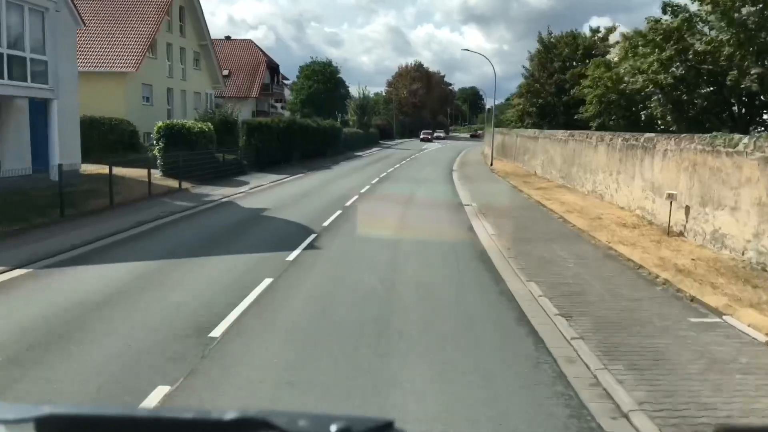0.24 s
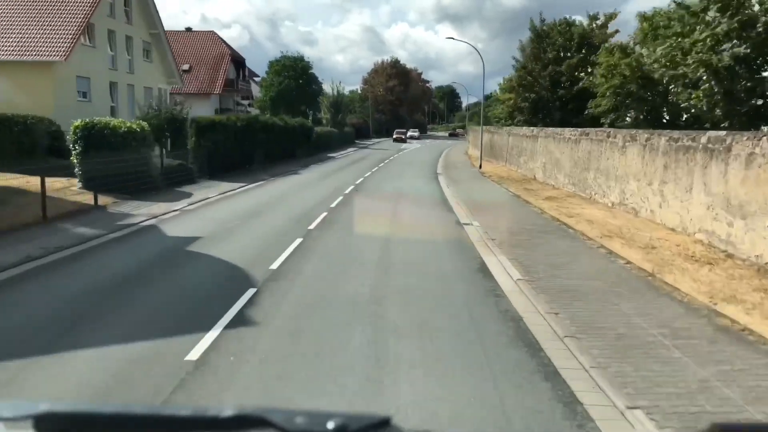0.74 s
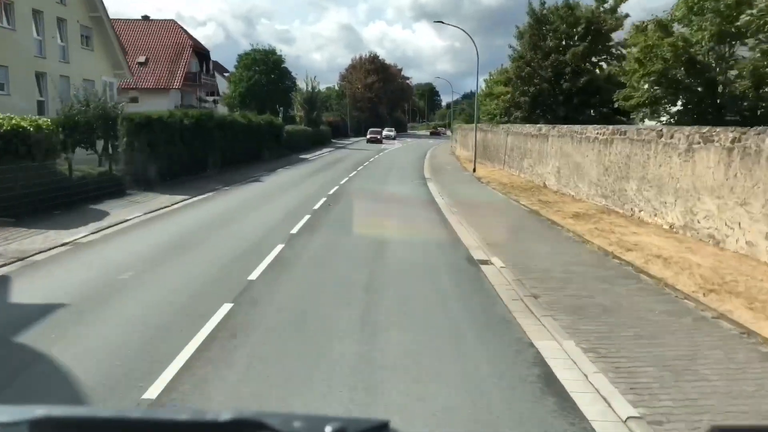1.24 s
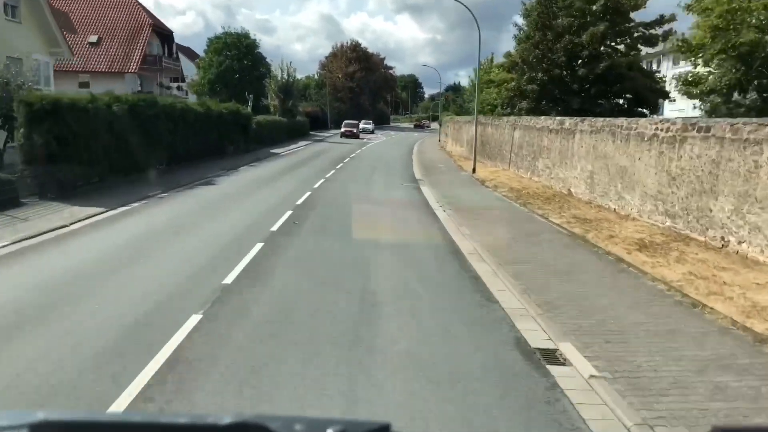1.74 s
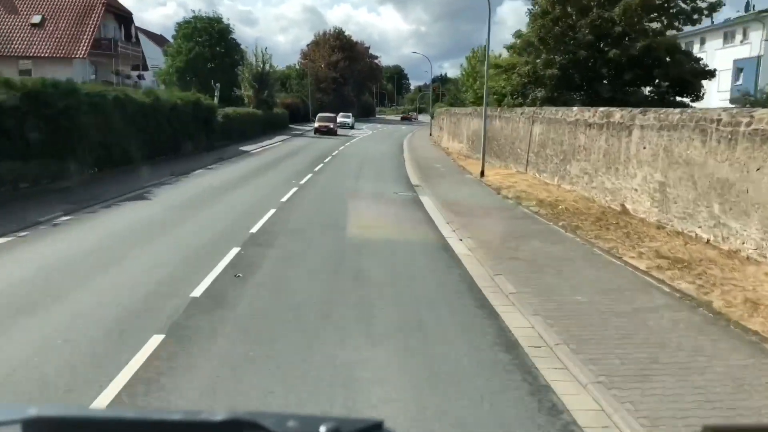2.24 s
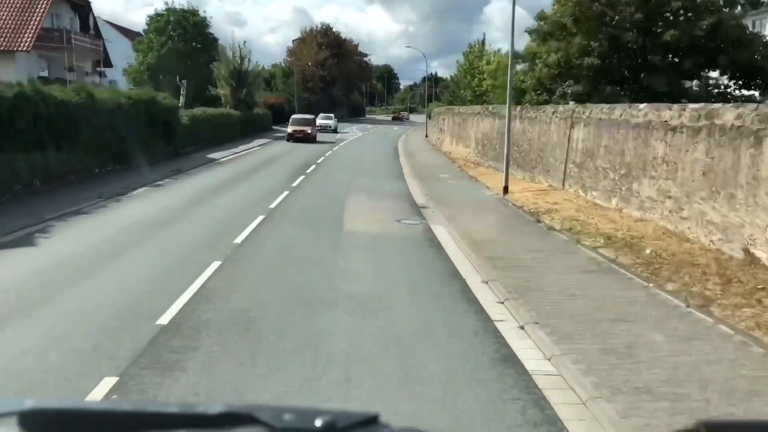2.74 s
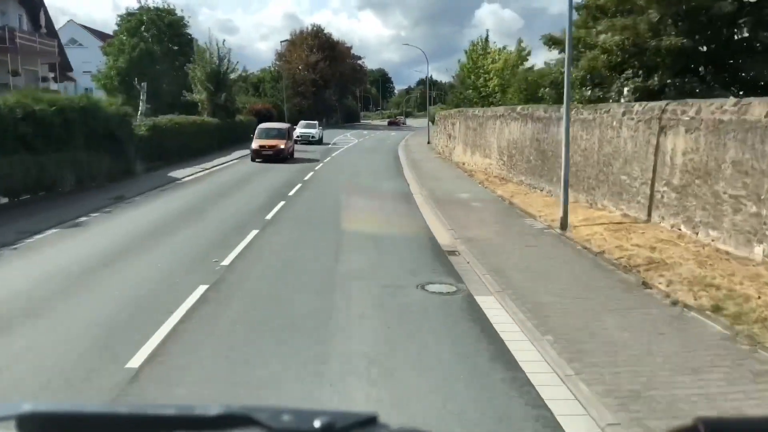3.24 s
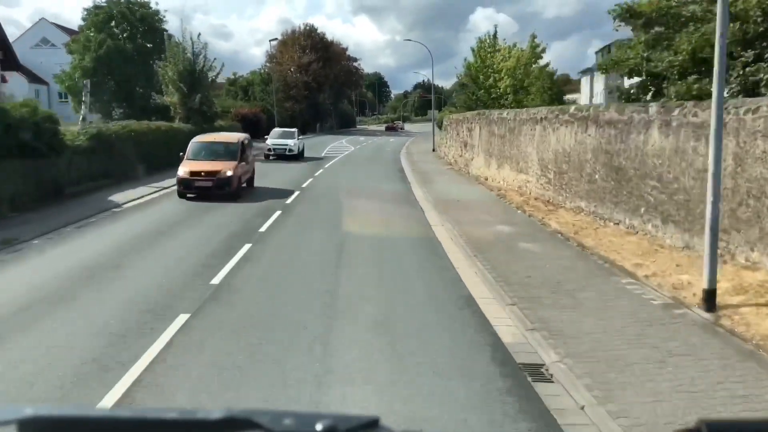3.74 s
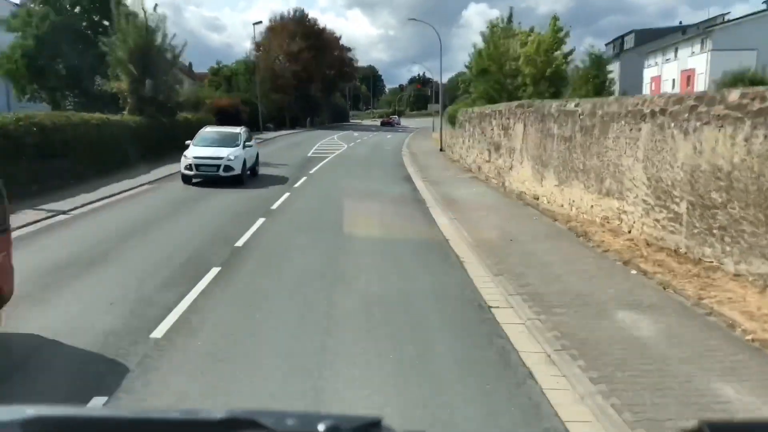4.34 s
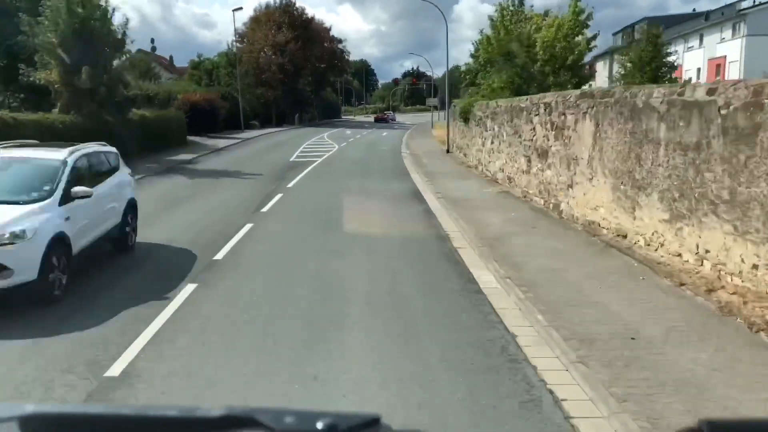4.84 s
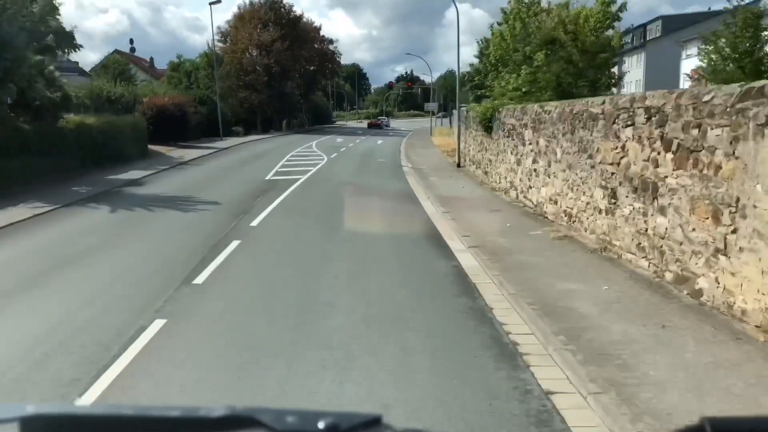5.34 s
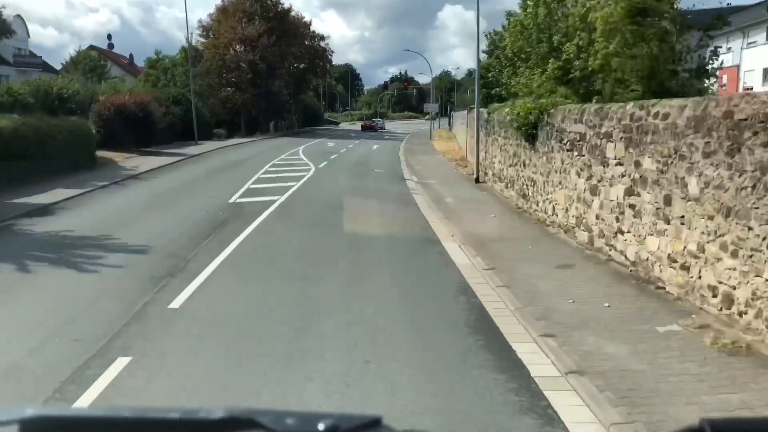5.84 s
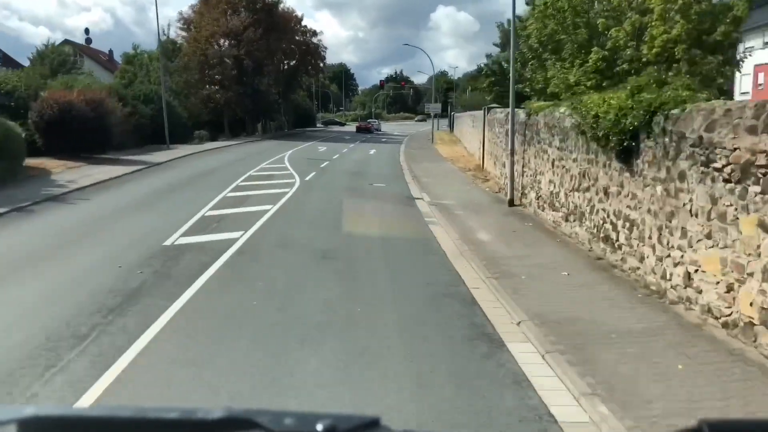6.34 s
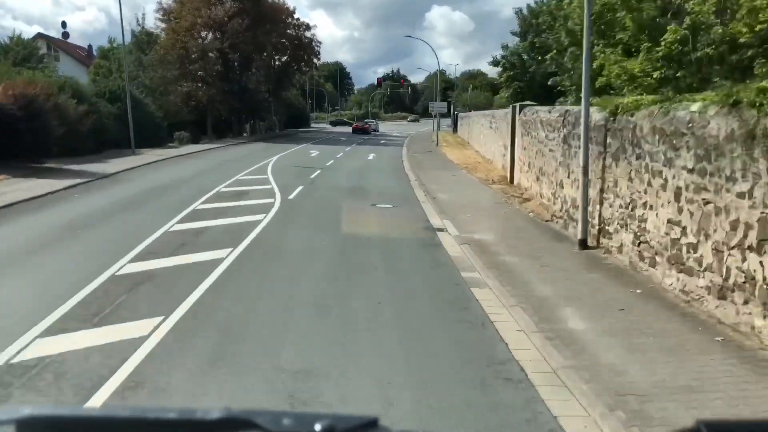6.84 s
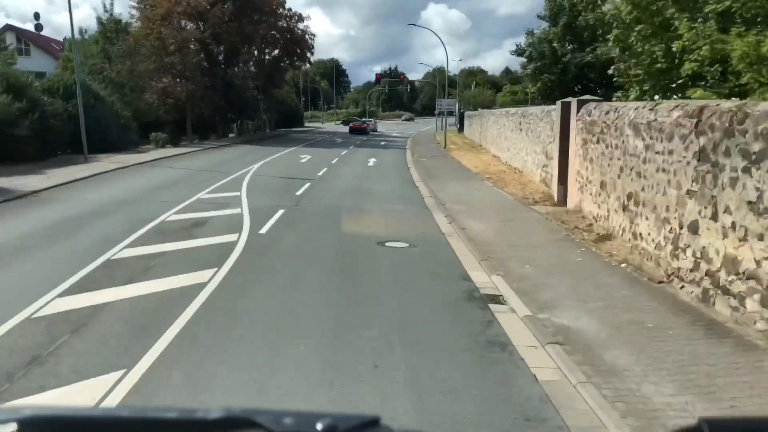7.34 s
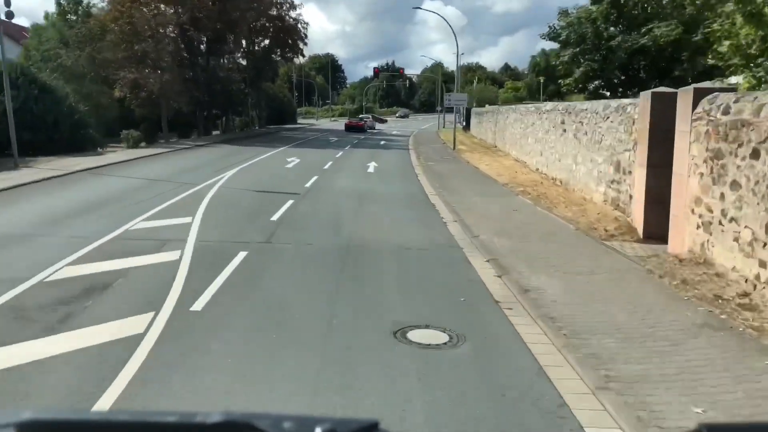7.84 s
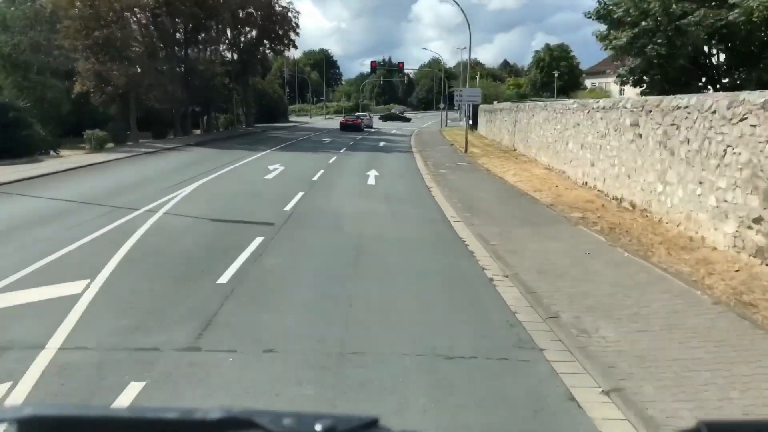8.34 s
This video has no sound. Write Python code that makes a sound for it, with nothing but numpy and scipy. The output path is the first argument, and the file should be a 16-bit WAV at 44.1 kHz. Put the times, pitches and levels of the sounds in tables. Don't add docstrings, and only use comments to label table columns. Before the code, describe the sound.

Inside a heavy truck cab, close to the windscreen. From 0 to 1.3 seconds the diesel pulls hard in low gear: a deep, booming drone climbing slightly, with road rumble, airy rush and loud, fluttering gear whine. From 1.3 to 2.4 the load drops away, the pitch sinks, a brief low axle hum shows and a high turbo whistle slides down. The higher gear engages around 2; from 2.6 to 3.8 the engine pulls again, lower and steadier, with fainter gear whine and a rising whistle. After 3.8 it eases off; the whistle falls again, a rush of air fades, and a slow low throb remains. At about 6.3 a short, sharp air hiss vents, with a thin swaying squeal from 6.6 to 7.7. Engine speed sags while tyre wash swells from 7.3, strongest after 8, with a faint soft puff near 8, ending still rolling at 8.6.

```python
import sys
import numpy as np
from scipy import signal
from scipy.io import wavfile
from scipy.ndimage import uniform_filter1d

SR = 44100
rng = np.random.default_rng(int(sys.argv[2]) if len(sys.argv) > 2 else 0)


def invert_db(x):
    u = np.asarray(x, float) / 20
    return 10 ** u


def to_wav(sig):
    pcm = np.clip(np.atleast_2d(sig), -1, 1) * 32767
    pcm = np.round(pcm).astype(np.int16)
    wavfile.write(sys.argv[1], SR, pcm.T)


N = 379701
TIME = np.arange(N) / SR

# f/Hz, level/dB per Hz
ROAD_SPECTRUM = [(30, -38), (50, -36), (65, -3), (160, 0.17), (250, -6), (400, -10), (700, -14),
                 (1200, -19), (1700, -26), (2400, -28.5), (4500, -33), (7000, -38.5), (11000, -44.5),
                 (15500, -60)]
# f/Hz, width/Hz, level/dB
PANEL_MODES = [(331.2, 74, -38), (695, 78, -45), (1052, 95, -50.5), (1368, 98, -51), (2349, 150, -54)]
# start t/s, end t/s, level/dB
ROUGH_STRETCH = (3.33, 4.37, 1.55)
# f/Hz, level/dB per Hz
ROAR_SPECTRUM = [(60, -30), (100, -1), (160, -29), (250, -6.5), (400, -11.5), (700, -15.5), (1200, -15),
                 (1700, -23), (2400, -23.5), (4500, -29.5), (5300, -31.5), (7000, -43), (11000, -40.5),
                 (15500, -43)]
# f/Hz, width/Hz, level/dB
BLOCK_MODES = [(1396, 24, -44), (1525, 62, -49), (1736, 81, -44.5), (2142, 79, -46.5), (4970, 150, -51)]
# f/Hz, level/dB per Hz
WASH_SPECTRUM = [(500, -26), (1200, -5.5), (1900, -6.5), (2300, 0), (3000, -2.5), (4500, -6), (7000, -10),
                 (11000, -12), (15500, -20)]
# f/Hz, width/Hz, level/dB
TREAD_MODES = [(2320, 260, -44), (2880, 240, -45)]
# t/s, level/dB
WASH_LEVEL = [(0, -6.5), (.2, -5.5), (1, -5), (1.6, -7), (2.05, -19), (2.6, -16), (3, -26), (3.6, -26),
              (3.8, -11), (4, -11.5), (4.5, -25), (6, -13.5), (6.9, -17), (7.35, -8.5), (7.85, -5.5),
              (8.02, -.5), (8.25, -0.5), (8.61, 0.5)]
# f/Hz, level/dB per Hz
VENT_SPECTRUM = [(1470, -33), (2500, 2), (2600, -6), (2830, 0), (3340, -5), (5720, 0), (7360, -0.5),
                 (15600, -2)]
# t/s, peak level/dB, rise t/s, hold t/s, fall/dB per s
VALVE_PUFFS = [
    (6.335, -32.5, .016, .053, 85),
    (6.18, -56, .02, .03, 200),
    (7.16, -58, .02, .03, 200),
    (7.96, -45, .05, .08, 60),
]
# t/s, f/Hz
ROTOR_DRIVE = [(0, 18600), (1.25, 18600), (1.3, 7500), (2.35, 7500), (3.1, 23500), (3.7, 22000),
               (3.75, 7500)]
# f/Hz, level/dB
WHISTLE_RESPONSE = [(8600, -72), (9050, -66), (10800, -59.5), (12000, -65.5), (14000, -60), (15300, -57.5),
                    (16500, -61), (18000, -75)]
# t/s, f/Hz
STAGE_DRIVE = [(0, 11550), (1.03, 11550), (1.1, 7500)]
# t/s, level/dB
STAGE_WHISTLE = [(0, -59), (.9, -58.5), (1.2, -56), (1.5, -65), (2.1, -80)]
TOOTH_ORDERS = (49.75, 63.75)
# start t/s, end t/s, level/dB of multiples 1, 1.5 and 2
MESH_TORQUE = [
    (-.2, 1.33, -37.5, -45, -47),
    (2.7, 3.85, -46, -52, -54),
]
# t/s, length t/s, multiple, level/dB
TOOTH_SINGS = [(.12, .1, 1, -33), (.31, .09, 1, -32), (.47, .1, 1, -32), (.73, .14, 1, -28),
               (.96, .08, 1, -35), (.34, .16, 1.5, -33), (.6, .22, 1.5, -33), (.8, .16, 1.5, -35),
               (.95, .22, 1.5, -33), (1.19, .2, 1.5, -32), (2.94, .13, 1, -40), (3.22, .16, 1, -39),
               (3.46, .16, 1, -39), (2.92, .13, 1.5, -41), (3.16, .1, 1.5, -43), (3.57, .14, 1.5, -42)]
# start t/s, end t/s, level/dB
TIMING_WHINE = (3.7, 7.3, -55.5)
# start t/s, end t/s, f/Hz, level/dB, width/Hz
AXLE_HUMS = [
    (1.15, 1.5, 187.5, -25, 4),
    (1.7, 2.0, 188, -30, 3),
    (6.55, 7.68, 4110, -53.5, 100),
]
# shaft order, level/dB over the fifth
SHAFT_HARMONICS = [(3, -7), (6, -4), (7, -9), (9, -14), (11, -10)]
# coasting level/dB, added pulling/dB, added braking/dB
SECOND_LEVELS = (-30, -4.5, 1)
FIFTH_LEVELS = (-42, 1.5, 8)
# t/s, f/Hz of the four-stroke cycle
CYCLE_SPEED = [(0, 14.05), (.8, 14.87), (1, 15.02), (1.2, 15), (1.4, 14.87), (1.6, 14.3), (1.8, 13.4),
               (2, 12.5), (2.2, 12.08), (2.45, 11.76), (2.7, 11.92), (3, 12), (3.4, 12.24), (3.9, 12.17),
               (5.2, 12.11), (7, 11.68), (7.8, 11.19), (8.61, 10.75)]
# t/s, level/dB
ENGINE_LOAD = [(0, 0), (1.2, -1.5), (1.45, -11), (1.8, -17), (2.3, -40), (2.6, -9), (2.85, -6), (3.6, -3),
               (3.9, -11.5), (4.25, -20), (6.2, -13), (6.7, -9), (8.61, -14)]
# t/s, level/dB
FIRING_STRENGTH = [(0, -20), (.25, -19), (.5, -22), (.7, -19), (1.3, -21.5), (1.55, -36), (1.85, -46),
                   (2.02, -23), (2.2, -41), (2.45, -32), (2.8, -20.5), (3.6, -20.5), (4, -31.5), (5.2, -37),
                   (7, -28), (8.2, -27.5), (8.61, -25.5)]
# order, low gear level/dB, pulling level/dB, coasting level/dB
WEAK_ORDERS = [(4, -42, -57, -51), (5, -40, -45, -48), (7, -34, -38, -42), (8, -31, -40, -47),
               (11, -34, -36, -38), (13, -37, -42, -46), (14, -34, -36, -41), (15, -41, -36, -42),
               (16, -48, -43, -47), (17, -44, -46, -47), (18, -42, -46, -46), (20, -45, -49, -49),
               (21, -47, -44, -48), (22, -46, -50, -48)]
# start t/s, end t/s, order, level/dB
CAB_SWELLS = [(-.1, 0.19, 12, -17.5), (.4, 1.208, 12, -18.5), (.6, .95, 12, -27), (1.55, 1.86, 12, -20.5),
              (2.027, 2.305, 12, -35), (2, 4.302, 12, -25), (3.063, 3.745, 12, -31), (4.5, 6.283, 12, -26),
              (6.154, 6.647, 12, -30.5), (6.55, 7.497, 12, -26), (8.004, 8.8, 12, -31), (.15, 1.53, 9, -21),
              (.45, 1.52, 9, -25), (2.25, 3.6, 9, -31.5), (3.5, 4.55, 9, -28.5), (4.6, 5.4, 9, -30.5),
              (7.5, 8.9, 9, -30.5), (-.3, 0.31, 10, -24), (.3, 1.5, 10, -33), (1.62, 2.03, 10, -24.5),
              (2.004, 2.454, 10, -28.5), (3, 4.296, 10, -30), (4.5, 5.3, 10, -34), (3.8, 4.246, 10, -35),
              (5.3, 6.5, 9, -35), (.2, 0.397, 12, -28)]
# start t/s, end t/s, order, level/dB
TRIM_BOOMS = [(0.288, 0.998, 18, -26), (.3, 1, 17, -34), (-.3, .7, 14, -26), (.8, 1.55, 8, -26),
              (3.45, 3.9, 17, -35), (4.7, 6.6, 22, -36), (7.795, 8.6, 20, -35), (7.798, 8.8, 21, -36.5),
              (7.9, 8.8, 22, -36.5)]


def evened(x):
    return x / np.sqrt(np.mean(x ** 2) + 1e-20)


def columns(rows):
    s, *values = np.transpose(rows)
    return [np.interp(TIME, s, v) for v in values]


def sounding(start, end, fade_s=0.057):
    return np.clip(np.minimum(TIME - start, end - TIME) / fade_s, 0, 1)


def arch(start, end):
    return np.sin(np.pi * np.clip((TIME - start) / (end - start), 0, 1)).clip(0)


def tone(turns, db):
    return np.sqrt(2) * invert_db(db) * np.cos(2 * np.pi * turns)


def wander(top_hz):
    rate_hz = 40
    steps = rng.standard_normal(int(N / SR * rate_hz) + 2)
    smooth = signal.lfilter([1], [1, -np.exp(-2 * np.pi * top_hz / rate_hz)], steps)
    return np.interp(TIME * rate_hz, np.arange(len(steps)), evened(smooth))


def noise(points, patchy_db, size=2048):
    frames, hz = N // (size // 4) + 5, np.fft.rfftfreq(size, 1 / SR)
    real, imaginary, patches = rng.standard_normal((frames, len(hz), 3)).T
    patches = uniform_filter1d(patches, size=30, axis=0)
    patches = evened(uniform_filter1d(patches, size=8, axis=1))
    f, db = np.transpose(points)
    colour_db = np.interp(np.log(hz + 1), np.log(f), db, left=-70)
    spectra = (real + 1j * imaginary) * invert_db(colour_db[:, None] + patchy_db * patches)
    return evened(signal.istft(spectra, nperseg=size, noverlap=size * 3 // 4)[1][:N])


def resonate(x, hz, width):
    turn = np.exp(2j * np.pi * np.cumsum(hz * np.ones(N)) / SR)
    r = np.exp(-np.pi * width / SR)
    return evened((turn * signal.lfilter([1], [1, -2 * r, r * r], x / turn)).real)


def ringing(modes):
    return sum(invert_db(db) * resonate(rng.standard_normal(N), hz, width) for hz, width, db in modes)


def road():
    low_gear_db = np.maximum(4.5 - 2 * TIME, 0)
    start, end, rough_db = ROUGH_STRETCH
    level_db = low_gear_db + rough_db * arch(start, end)
    return invert_db(level_db) * (invert_db(-27.5) * noise(ROAD_SPECTRUM, 0.99) + ringing(PANEL_MODES))


def tyre_wash():
    level_db = columns(WASH_LEVEL)[0] + 1.04 * wander(12.0)
    tread = sounding(5.8, 8.5, 0.56) * ringing(TREAD_MODES)
    return invert_db(level_db) * (invert_db(-35.5) * noise(WASH_SPECTRUM, 0.6) + tread)


def air_valve():
    flow = np.zeros(N)
    for s, db, rise, hold, fall_db in VALVE_PUFFS:
        after = np.maximum(TIME - s - hold, 0)
        puff = invert_db(db - fall_db * after * (0.4 + 3.0 * after))
        seep = invert_db(db - 27 - 34 * after)
        flow += np.clip((TIME - s) / rise, 0, 1) * (puff + seep)
    return flow * noise(VENT_SPECTRUM, 0.85, size=512)


def spool(drive):
    lag_s = 1.2
    drive_hz, keep = columns(drive)[0], np.exp(-1 / (lag_s * SR))
    rotor_hz = signal.lfilter([1 - keep], [1, -keep], drive_hz - drive_hz[0]) + drive_hz[0]
    return rotor_hz, np.clip((drive_hz - drive_hz[-1]) / 2000, 0, 1)


def turbocharger():
    rotor_hz, driven = spool(ROTOR_DRIVE)
    spool_up_db = -5.5
    rotor_db = np.interp(rotor_hz, *np.transpose(WHISTLE_RESPONSE)) + spool_up_db * driven
    stage_hz, stage_db = spool(STAGE_DRIVE)[0], columns(STAGE_WHISTLE)[0]
    out = np.zeros(N)
    for hz, db in ((stage_hz, stage_db), (rotor_hz, rotor_db)):
        fast = np.clip((hz - 10500) / 4000, 0, 1)
        whistle = (1 - .45 * fast) * resonate(rng.standard_normal(N), hz, 300)
        hiss = resonate(rng.standard_normal(N), .99 * hz, 1400)
        intake = (.25 + .75 * fast * (1 - .8 * driven)) * hiss
        out += invert_db(db + 1.8 * wander(10)) * (whistle + intake)
    return out * sounding(-1, 6.3, .11)


def gear_mesh(cycle_hz):
    out = np.zeros(N)
    for order, (start, end, *steady_db) in zip(TOOTH_ORDERS, MESH_TORQUE):
        for multiple, db in zip((1, 1.5, 2), steady_db):
            hz = multiple * order * cycle_hz
            sings = sum(invert_db(top_db) * arch(s - length / 2, s + length / 2)
                        for s, length, m, top_db in TOOTH_SINGS
                        if round(2 * m) == 2 * multiple and start < s < end)
            steady = invert_db(db) * sounding(start, end, 0.14)
            fuzz = resonate(rng.standard_normal(N), hz, 76)
            line = tone(np.cumsum(hz) / SR, 2.5 * wander(12))
            out += (.6 * steady + .9 * sings) * line + (steady + .45 * sings) * fuzz
    return out


def timing_gears(cycle_hz):
    start, end, db = TIMING_WHINE
    whine = resonate(rng.standard_normal(N), 178.6 * cycle_hz, 24)
    return sounding(start, end, .5) * invert_db(db + 1.5 * wander(3.0)) * whine


def hums_and_squeal():
    out = np.zeros(N)
    for start, end, hz, db, width in AXLE_HUMS:
        sway_depth = .017 * (hz > 1000)
        sway = 1 + sway_depth * np.sin(2 * np.pi * (TIME - start) / 1.05)
        out += sounding(start, end, 0.094) * invert_db(db) * resonate(rng.standard_normal(N), hz * sway, width)
    return out


def drive_shaft(cycle_hz, pulling):
    shaft_ratio, lead_turns = 2.825, 0.2
    engage_s, brake_s, brake_rise_s = 2.02, 6.47, 0.22
    turns = shaft_ratio * np.cumsum(cycle_hz) / SR
    braking = np.clip((TIME - brake_s) / brake_rise_s, 0, 1)
    second_db, fifth_db = (coast + pull * pulling + brake * braking
                           for coast, pull, brake in (SECOND_LEVELS, FIFTH_LEVELS))
    fifth_db = fifth_db + 1.0 * wander(2.7)
    out = tone(2 * turns + lead_turns, second_db) + tone(5 * turns, fifth_db)
    for order, db in SHAFT_HARMONICS:
        out += tone(order * turns + rng.random(), fifth_db + db + 2.5 * wander(1.5))
    return out * np.clip((TIME - engage_s) / 0.2, 0, 1)


def combustion_roar(load_db):
    return invert_db(load_db) * (invert_db(-28.5) * noise(ROAR_SPECTRUM, 2.3) + ringing(BLOCK_MODES))


def engine_orders(cycle_hz, pulling):
    between_swells_db, swell_edge = -50.5, 0.27
    turns = np.cumsum(cycle_hz) / SR
    out = tone(6 * turns, columns(FIRING_STRENGTH)[0])
    for order in (9, 10, 12):
        swells = sum(invert_db(db) * arch(start, end) ** swell_edge
                     for start, end, k, db in CAB_SWELLS if round(k) == order)
        out += (swells + invert_db(between_swells_db)) * tone(order * turns + rng.random(), .6 * wander(3.0))
    low_gear = np.clip((cycle_hz - 12.6) / 1.2, 0, 1)
    for order, low_db, pull_db, coast_db in WEAK_ORDERS:
        high_db = coast_db + pulling * (pull_db - coast_db)
        level_db = high_db + low_gear * pulling * (low_db - high_db)
        unsteady_db = .15 * order * wander(3.0)
        out += tone(round(order) * turns + rng.random(), level_db + unsteady_db)
    for start, end, order, db in TRIM_BOOMS:
        out += arch(start, end) * tone(round(order) * turns + rng.random(), db)
    return out


def scene():
    cycle_hz, load_db = columns(CYCLE_SPEED)[0], columns(ENGINE_LOAD)[0]
    pulling = np.clip((load_db + 18) / 11, 0, 1)
    surroundings = road() + tyre_wash() + air_valve()
    machinery = turbocharger() + gear_mesh(cycle_hz) + timing_gears(cycle_hz) + hums_and_squeal()
    drive = drive_shaft(cycle_hz, pulling) + combustion_roar(load_db) + engine_orders(cycle_hz, pulling)
    return (surroundings + machinery + drive)[None]


def roll_off(x):
    return signal.sosfilt(signal.butter(12, 15740, fs=SR, output="sos"), x)


def record(dry):
    mix = dry * np.clip(TIME / 0.0014, 0, 1)
    return roll_off(mix)


dry = scene()
out = record(dry)
to_wav(out)
```